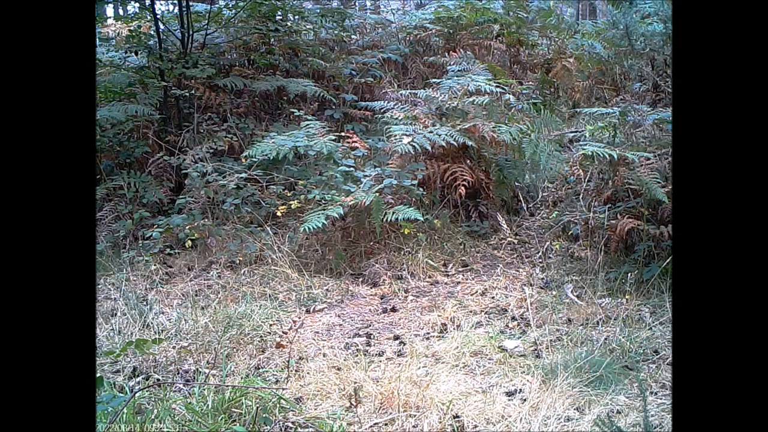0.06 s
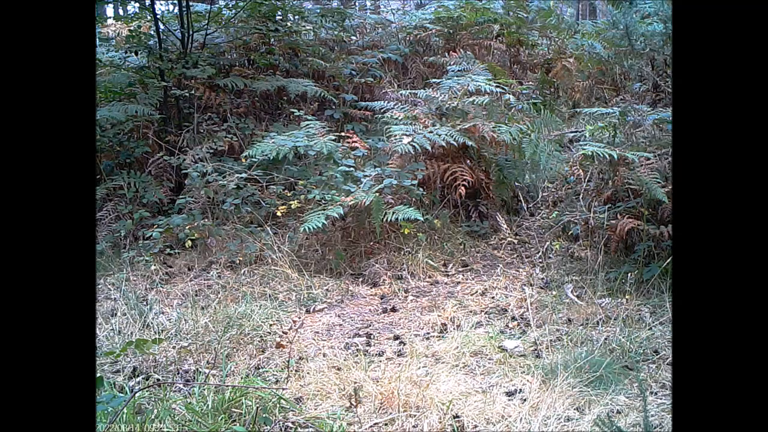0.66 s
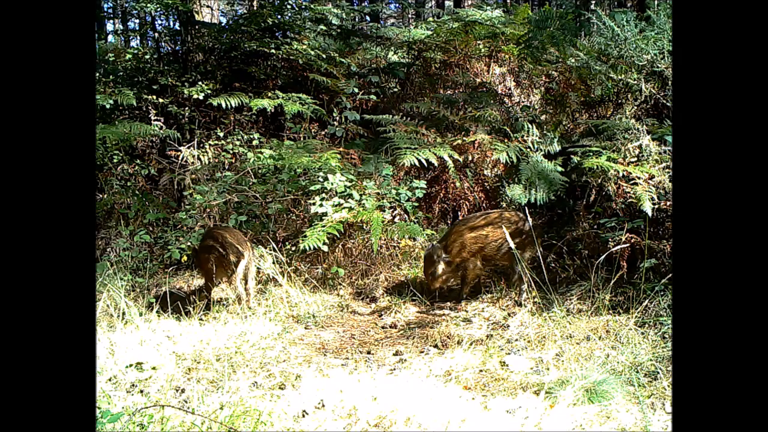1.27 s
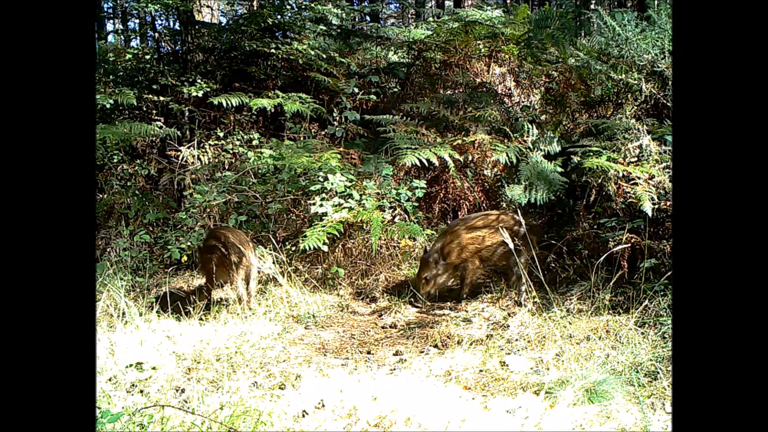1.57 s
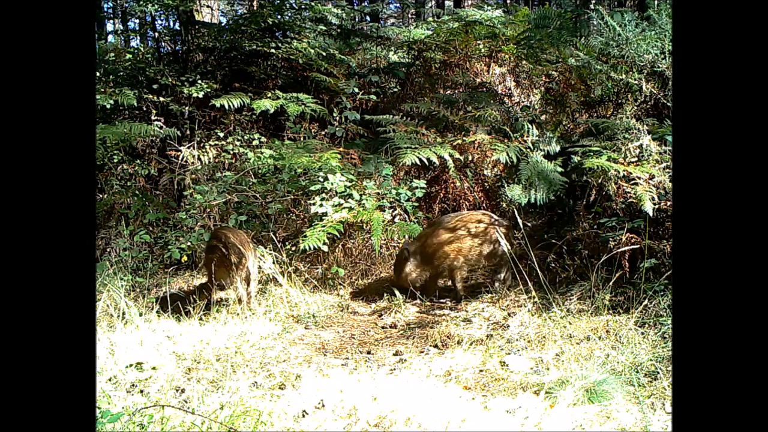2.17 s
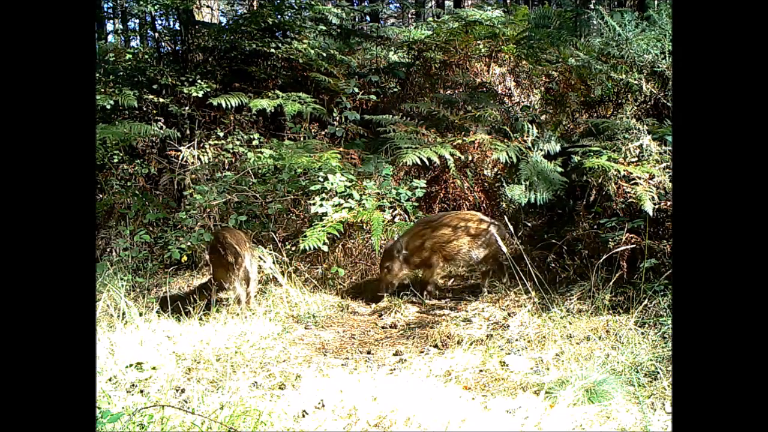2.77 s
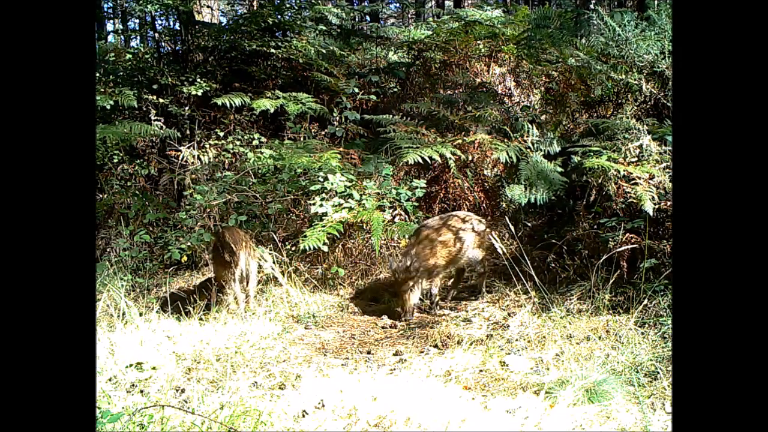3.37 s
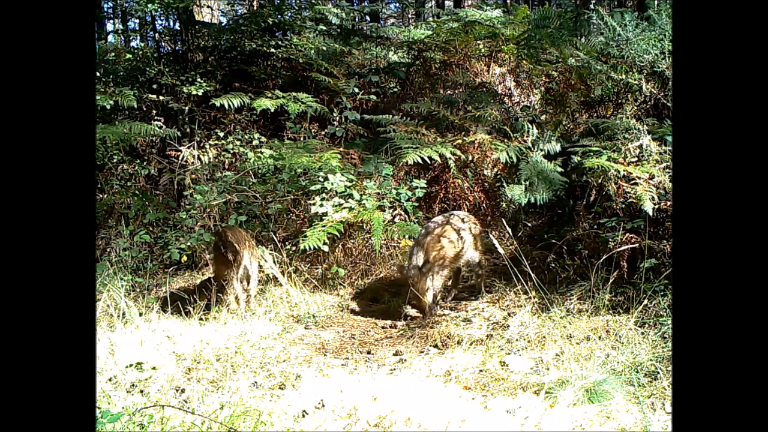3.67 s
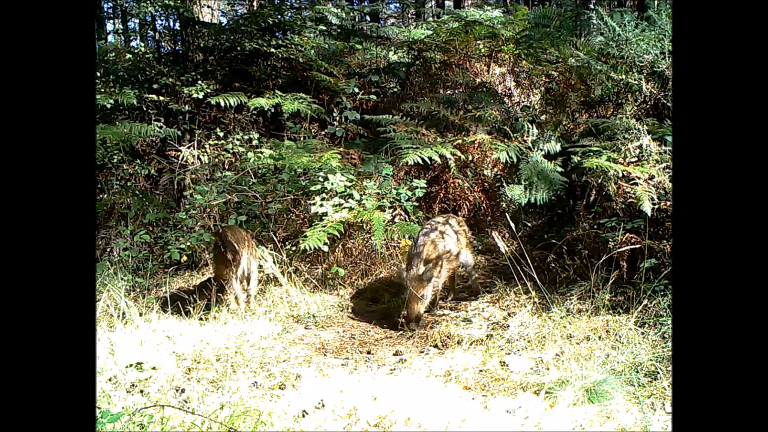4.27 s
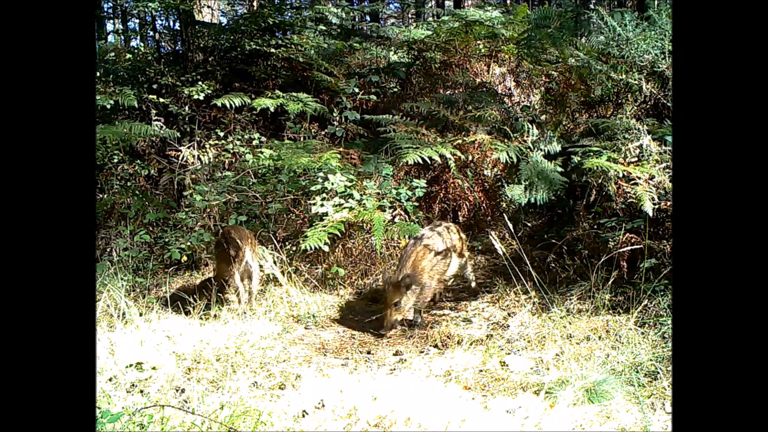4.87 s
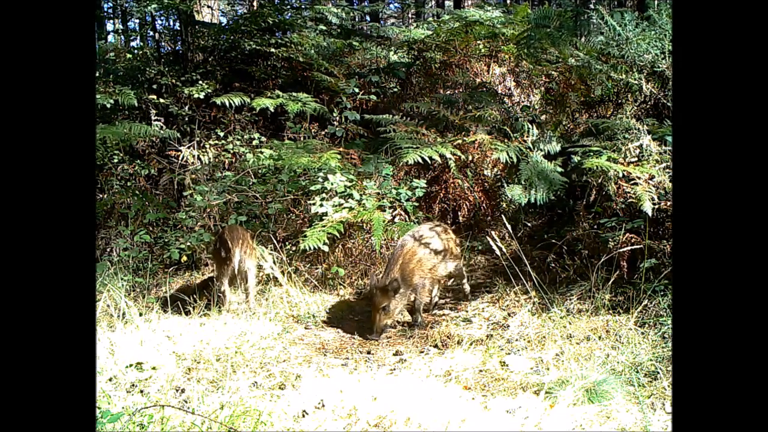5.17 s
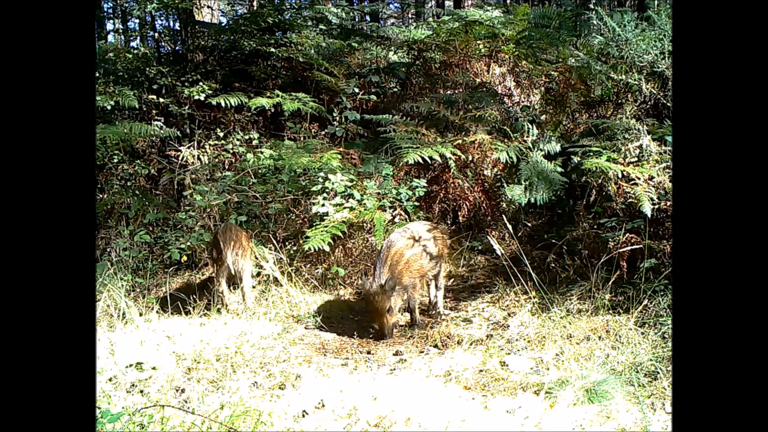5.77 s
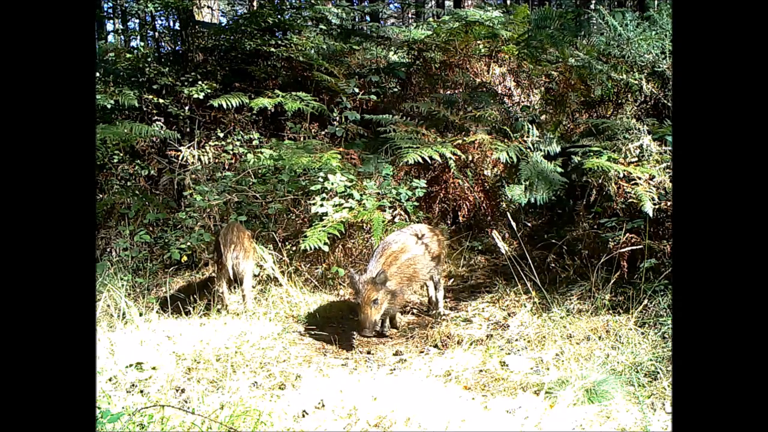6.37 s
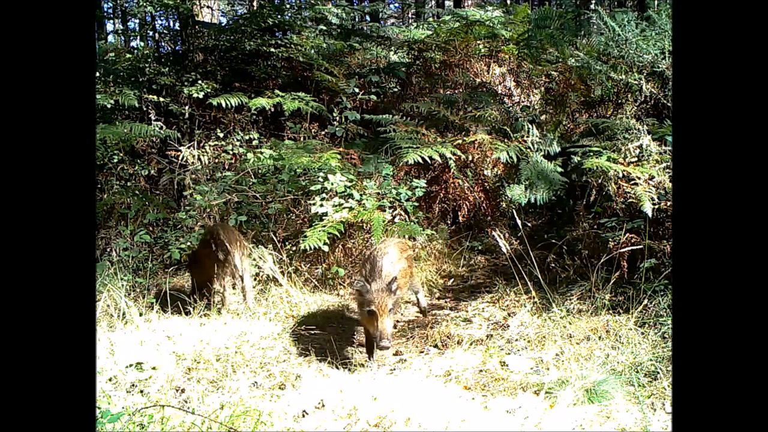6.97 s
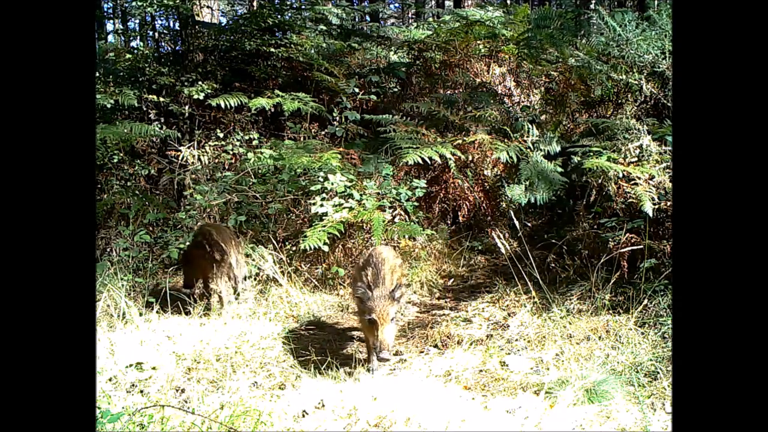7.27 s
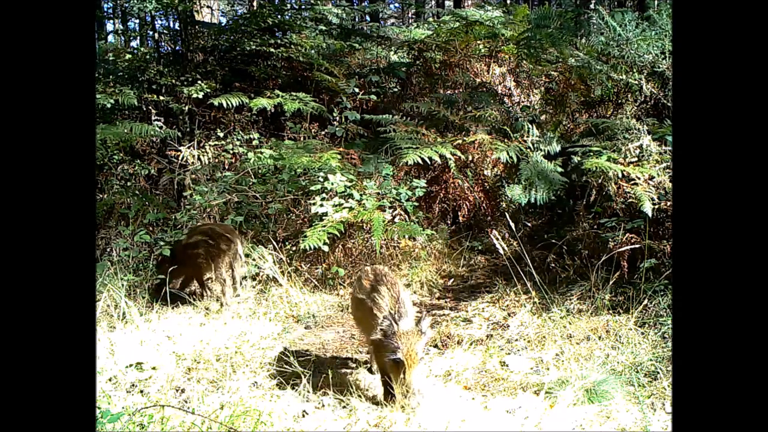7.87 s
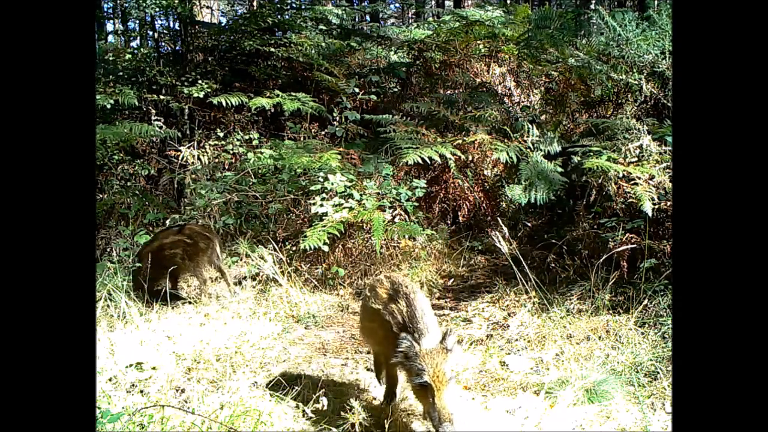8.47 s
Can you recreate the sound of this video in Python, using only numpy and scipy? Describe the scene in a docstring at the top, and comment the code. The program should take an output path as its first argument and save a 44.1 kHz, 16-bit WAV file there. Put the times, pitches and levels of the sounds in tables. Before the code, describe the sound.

Faint birds stop at a sudden pop, then young boar rustle and snap dry grass, coming closer over low rumble and hiss.

```python
"""Thin, far bird whistles sound over a low rumble and hiss, at a trail camera in a forest clearing.
The camera restarts with a pop, a voltage step draining through a capacitor, and its sound fades back in.
Two young boar then root in dry grass, and one walks closer. Each fracture is an impulse that excites
broad resonances: blades crackle in clumps, stalks snap under hoof and snout, and litter crunches."""
import sys
import numpy as np
from scipy import signal
from scipy.fft import rfft, irfft
from scipy.io import wavfile

SR = 44100
rng = np.random.default_rng(int(sys.argv[2]) if len(sys.argv) > 2 else 0)


def generate_wav(sig):
    """Save sig (samples, or channels by samples) to the path in sys.argv[1] as 16-bit PCM at SR."""
    pcm = np.round(np.clip(np.atleast_2d(sig).T, -1, 1) * 32767).astype(np.int16)
    wavfile.write(sys.argv[1], SR, pcm)


N = 384552
TIME = np.arange(N) / SR

# bird notes: (start [s], length [s], start pitch [Hz], end pitch [Hz], relative level [dB], rasp [Hz])
BIRD_NOTES = [(0.0, 0.049, 8200, 8150, -50, 60), (0.0, 0.018, 6320, 6180, -48, 60),
              (0.048, 0.1, 7900, 7300, -50.5, 260), (0.318, 0.047, 8350, 8170, -50.5, 200),
              (0.382, 0.032, 6200, 5080, -49.5, 200), (0.409, 0.0294, 6020, 5860, -46.5, 150),
              (0.613, .13, 6100, 6390, -47.5, 120), (1.054, .08, 7150, 7200, -55, 130),
              (1.147, 0.1, 7300, 7540, -55, 90), (1.28, 0.044, 5530, 5530, -52, 70)]
# spectra of the rumble, its deepest part and the hiss: (frequency [Hz], relative density [dB])
RUMBLE_SPECTRUM = [(8.2, -27), (14, 0), (38, -8), (46, -7), (54, -8.5), (75, -13.5), (300, -23.5),
                   (390, -64), (660, -120)]
BOOM_SPECTRUM = [(16, -1.5), (25, -12), (30, 0.5), (34, -7.5), (41, -30), (120, -92)]
HISS_SPECTRUM = [(180, -35), (300, -10), (321, -1.5), (405, -2.5), (462, -3), (528, -3.5), (737, -5),
                 (1170, -7.5), (1580, -9), (3890, -14), (6740, -16), (8360, -18), (10400, -18),
                 (14500, -18), (16000, -29)]
# shoves of snout or leg through grass, the first few far off: (start [s], length [s], relative level [dB])
SHOVES = [(.14, .05, -62), (.375, .045, -54), (0.778, .06, -62), (1.268, .03, -59), (2.085, 0.028, -56),
          (2.262, 0.13, -56.5), (2.52, .11, -60), (2.723, 0.21, -64), (3.106, 0.03, -54),
          (3.192, 0.13, -59.5), (3.384, .14, -56), (3.70, 0.086, -58.5), (4.04, .13, -65),
          (4.284, .12, -64), (4.673, 0.17, -59), (5.112, 0.04, -57), (5.36, .13, -63), (5.609, 0.062, -51),
          (5.68, 0.12, -61), (6.086, .125, -61), (6.66, 0.075, -54.5), (6.793, 0.098, -63),
          (7.11, 0.16, -59), (7.40, 0.043, -55), (7.653, 0.064, -53), (7.75, 0.21, -57),
          (8.084, 0.095, -49), (8.27, 0.083, -52), (8.43, 0.084, -58.5), (8.613, .1, -62)]
# the boar's approach: (time [s], nearness [0-1])
APPROACH = [(2.0, 0.2), (6.5, 0.4), (7.3, 0.2), (7.8, 1), (8.7, 0.9)]
# bands that colour the snaps, a woody body and the microphone's two bright resonances:
# (frequency [Hz], bandwidth [Hz], gain [dB])
SNAP_BANDS = [(3600, 2800, -1), (6450, 2300, 0), (11200, 2400, 0)]
# band of the blades' fine crackle, far and near: (frequency [Hz], bandwidth [Hz], gain [dB])
BLADES_FAR, BLADES_NEAR = (10540, 1900, 0), (11400, 2100, 0)
# input gain after the restart: (time [s], gain [dB])
FADE_IN = [(1.36, -16), (1.72, -17), (1.85, -12), (1.98, -8), (2.03, -3.5), (2.09, -0.5)]
# faint voltage steps as the gain comes back up: (time [s], height [full scale])
GAIN_TICKS = [(1.787, 0.0045), (1.833, 0.004), (1.874, 0.006), (1.909, 0.0066)]
# stalks snapping: (time [s], relative level [dB], upper over lower bright band [dB])
STALK_SNAPS = [(1.781, -33, -12), (2.33, -34, -5), (2.395, -39, 0), (3.518, -30.5, 5), (4.371, -36, 0.5),
               (5.24, -38, -7), (5.3847, -40, -9), (5.6481, -40, 4), (5.743, -32.5, 1), (6.345, -36, -7),
               (6.426, -31, 6.5), (6.6303, -36, 4), (6.666, -27.5, 2), (6.7822, -31.5, 6), (6.8199, -42, 2),
               (6.8568, -36, 4), (7.0737, -35, -8), (7.0893, -33, -5), (7.1358, -36, 1), (7.1435, -35, 4),
               (7.1746, -43, 5), (7.2438, -39, -10), (7.663, -27.5, 4), (7.9401, -27, 7), (7.946, -37, 7),
               (8.1194, -35, 8), (8.2761, -37, 4), (8.5829, -38, 7), (8.6547, -41, 4), (8.7086, -42, 7)]
# litter crushed under a hoof: (centre time [s], half length [s], level [dB], relative woody body [dB])
HOOF_CRUNCHES = [(2.354, .01, -57, -14), (5.245, 0.0076, -48, -6), (7.087, .007, -47, 1.5),
                 (7.146, .007, -54, -10), (7.46, .009, -48, -5), (8.122, .013, -51, -7),
                 (8.335, .017, -52, -12)]

RESTART_S, ROOTING_FROM_S = 1.35115, 2.0


def from_db(db):
    """Amplitude grows tenfold with every 20 dB."""
    return 10 ** (np.asarray(db) / 20)


def unit_rms(x):
    """Dividing a signal by its rms gives it unit power."""
    return x / np.sqrt(np.mean(x ** 2) + 1e-20)


def curve(rows):
    """Linear interpolation gives a (time, value) curve at every sample."""
    return np.interp(TIME, *np.transpose(rows))


def resonate(x, band):
    """A broad resonance acts as a band-pass filter; at 0 dB, white input keeps its power."""
    hz, width_hz, db = band
    edges = np.clip([hz - width_hz / 2, hz + width_hz / 2], 50, SR / 2 - 100)
    bandpass = signal.butter(2, edges, "band", fs=SR, output="sos")
    return from_db(db) * np.sqrt(SR / 2 / width_hz) * signal.sosfilt(bandpass, x + 1e-18)


def birds(gain_db, trill_hz):
    """Frequency modulation by a quick, uneven trill makes thin gliding whistles raspy."""
    song = np.zeros(N)
    for start, length, start_hz, end_hz, db, rasp_hz in BIRD_NOTES:
        progress = np.clip((TIME - start) / length, 0, 1)
        trill = unit_rms(resonate(rng.standard_normal(N), (trill_hz, trill_hz, 0)))
        pitch = start_hz + (end_hz - start_hz) * progress + rasp_hz * trill
        swell = np.sqrt(4 * progress * (1 - progress))
        song += from_db(db + gain_db) * swell * np.sin(2 * np.pi * np.cumsum(pitch) / SR)
    return song


def forest_reverb(x, t60_s, wet_db):
    """Scattering from trunks and leaves adds an exponentially decaying tail."""
    tail = rng.standard_normal(SR) * from_db(-60 * TIME[:SR] / t60_s)
    return x + from_db(wet_db) * signal.fftconvolve(x, tail / np.linalg.norm(tail))[:N]


def background(spectrum, level_db):
    """Spectral shaping turns white noise into a steady rumble or hiss."""
    hz, db = np.transpose(spectrum)
    bins = np.maximum(np.fft.rfftfreq(N, 1 / SR), 1)
    shape = from_db(np.interp(np.log(bins), np.log(hz), db))
    return from_db(level_db) * unit_rms(irfft(rfft(rng.standard_normal(N)) * shape, N))


def shoving(near, attack_s=0.0092, release_s=0.009):
    """Incoherent sources add in power: a steady stir and the shoves set the rustle's amplitude."""
    stir_db = -67 + 11 * near
    power = from_db(stir_db) ** 2 * (TIME > ROOTING_FROM_S)
    for start, length, db in SHOVES:
        attack = np.clip((TIME - start) / attack_s, 0, 1)
        release = np.exp(-np.clip((TIME - start - length) / release_s, 0, 20))   # blades spring back
        power += (from_db(db) * attack * release) ** 2
    return np.sqrt(power)


def fractures(per_s, spread_db):
    """Tiny independent fractures form a Poisson train of uneven impulses; rms 1."""
    sizes = from_db(spread_db * np.minimum(rng.exponential(1, N), 4))
    breaks = rng.random(N) < per_s / SR
    return unit_rms(breaks * sizes * rng.choice([-1, 1], N))


def grass_rustle(gain_db, clump_db):
    """Random amplitude modulation clumps the crackle of dry blades, higher in pitch from close by."""
    near = curve(APPROACH)
    knots = np.arange(0, N, SR // 80)
    flicker = np.interp(np.arange(N), knots, rng.standard_normal(len(knots)))
    envelope = unit_rms(from_db(clump_db * flicker)) * shoving(near)
    far_blades = fractures(per_s=5100, spread_db=5.5) * envelope
    near_blades = fractures(per_s=7000, spread_db=5.5) * envelope
    far_gain, near_gain = np.sqrt(1 - near), np.sqrt(near)   # equal-power crossfade
    fine = far_gain * resonate(far_blades, BLADES_FAR) + near_gain * resonate(near_blades, BLADES_NEAR)
    coarse = resonate(far_gain * far_blades + near_gain * near_blades, SNAP_BANDS[1])
    coarse_db = -1 - 4.5 * near
    return from_db(gain_db) * (fine + from_db(coarse_db) * coarse)


def pop(start, height, decay_s=0.19):
    """A step in the input voltage drains exponentially through the coupling capacitor."""
    return height * (TIME >= start) * np.exp(-np.maximum(TIME - start, 0) / decay_s)


def stalk_snaps(gain_db, splinter_db, splinter_s, delay_s):
    """Impulse excitation: a stalk's sharp crack and faint splintering ring the three snap bands."""
    splinters = from_db(splinter_db) * fractures(per_s=6000, spread_db=1.0)
    drive = np.zeros((len(SNAP_BANDS), N))
    for start, db, brightness_db in STALK_SNAPS:
        # a snap louder than the usual -35 dB is a thicker stalk, with more woody body
        woody_db = -10 + 0.3 * (db + 35)
        onset = round((start + delay_s) * SR)
        span = slice(onset, min(onset + SR // 10, N))
        force = splinters[span] * np.exp(-(TIME[span] - TIME[onset]) / splinter_s)
        force[0] = 1   # the crack itself
        shares = from_db([woody_db, -brightness_db / 2, brightness_db / 2])
        drive[:, span] += from_db(db + gain_db) * np.outer(shares, force)
    return sum(resonate(x, band) for x, band in zip(drive, SNAP_BANDS))


def hoof_crunches():
    """Superposition: many stalks break at once under a hoof, and thicker twigs add a woody body."""
    woody, mic_low, mic_high = SNAP_BANDS
    breaks = fractures(per_s=2200, spread_db=1.5)
    stalks, twigs = np.zeros((2, N))
    for centre, half_s, db, woody_db in HOOF_CRUNCHES:
        load = from_db(db) * np.exp(-0.5 * ((TIME - centre) / half_s) ** 2) * breaks
        stalks += load
        twigs += load * from_db(woody_db)
    crackle = from_db(-5.5) * resonate(stalks, mic_low) + from_db(-7.5) * resonate(stalks, mic_high)
    return resonate(twigs, woody) + crackle


def scene():
    """Sound pressures add linearly: far birds, the steady background and the boar."""
    song = birds(gain_db=-6.0, trill_hz=130.0)
    song = forest_reverb(song, t60_s=0.75, wet_db=4.0)   # trees give a long tail
    song *= TIME < RESTART_S   # the birds break off at the restart
    rumble = background(RUMBLE_SPECTRUM, level_db=-45.5) + background(BOOM_SPECTRUM, level_db=-41.5)
    hiss = background(HISS_SPECTRUM, level_db=-52)
    rustle = grass_rustle(gain_db=-2.0, clump_db=4.0)
    snaps = stalk_snaps(gain_db=5.5, splinter_db=-21.5, splinter_s=0.002, delay_s=0.00077)
    boar = rustle + snaps + hoof_crunches()
    boar = forest_reverb(boar, t60_s=0.15, wet_db=-13)   # nearby ferns give a faint, short tail
    return (song + rumble + hiss + boar)[None]


def record(dry):
    """The restart pops and drops the gain, which recovers with ticks; a low-pass limits the bandwidth."""
    gain = np.where(TIME < RESTART_S, 1, from_db(curve(FADE_IN)))
    pops = pop(RESTART_S, height=0.3) + sum(pop(start, height) for start, height in GAIN_TICKS)
    lowpass = signal.firwin(101, cutoff=15800, fs=SR, window=("kaiser", 8))
    return signal.fftconvolve(dry * gain + pops, lowpass[None], mode="same")


dry = scene()
out = record(dry)
generate_wav(out)
```